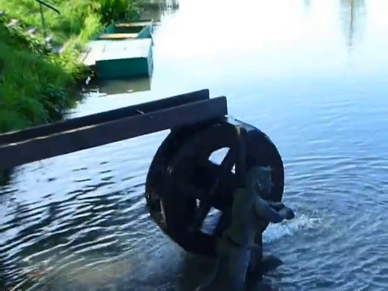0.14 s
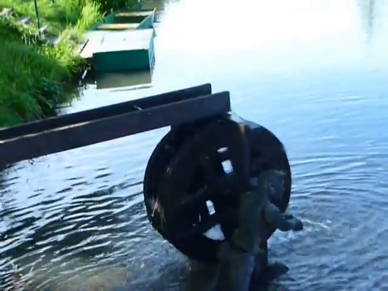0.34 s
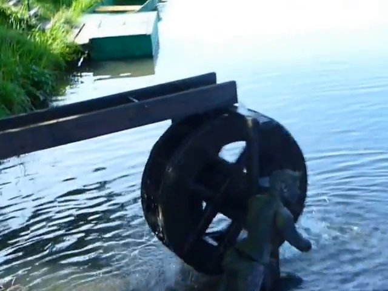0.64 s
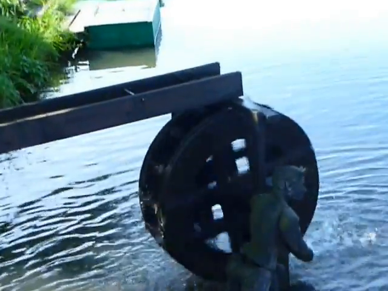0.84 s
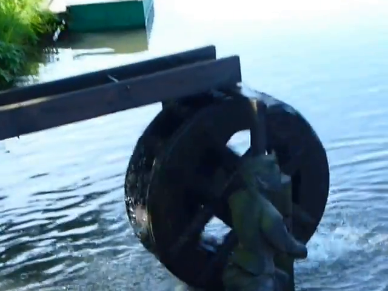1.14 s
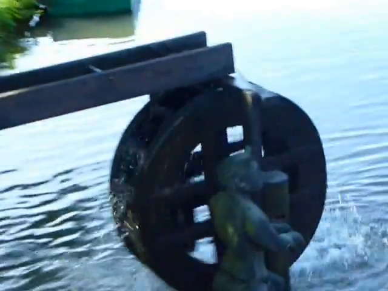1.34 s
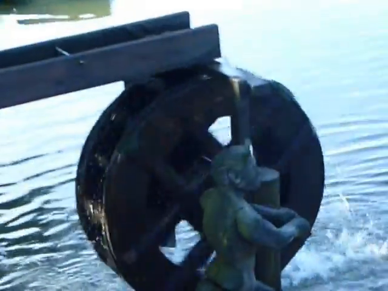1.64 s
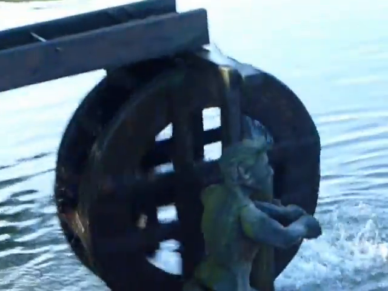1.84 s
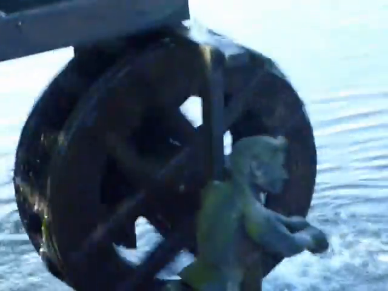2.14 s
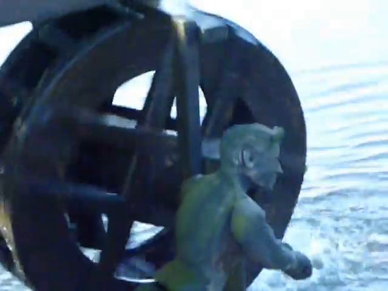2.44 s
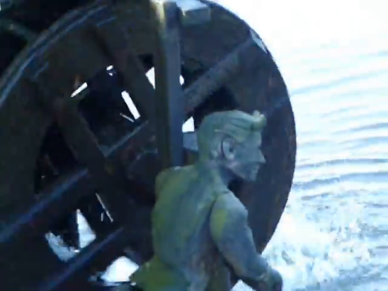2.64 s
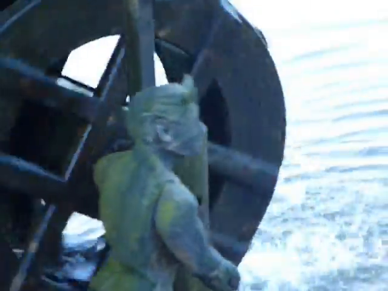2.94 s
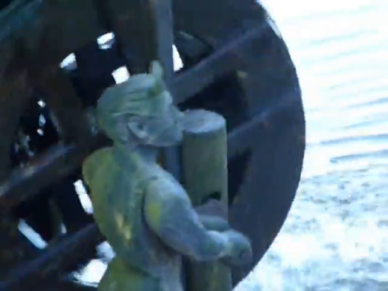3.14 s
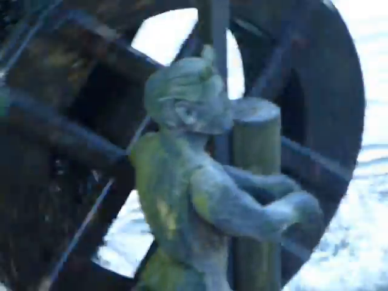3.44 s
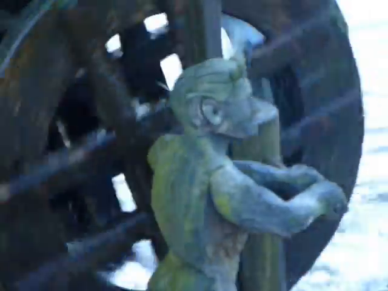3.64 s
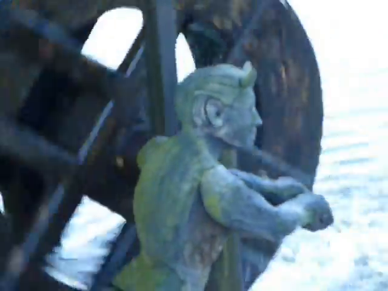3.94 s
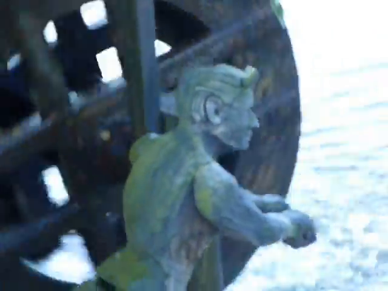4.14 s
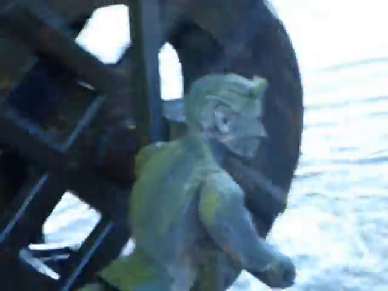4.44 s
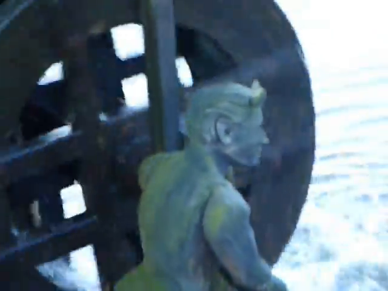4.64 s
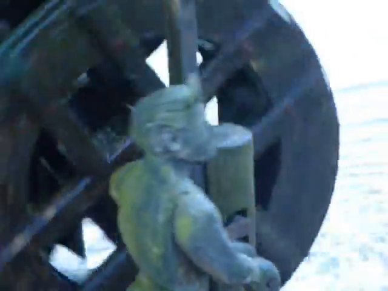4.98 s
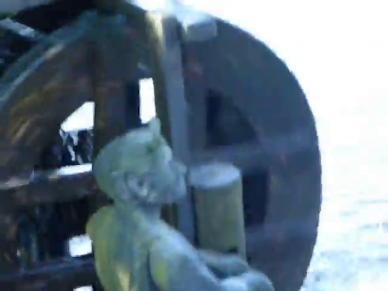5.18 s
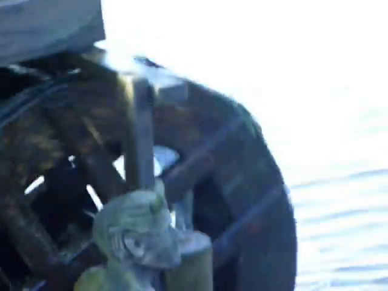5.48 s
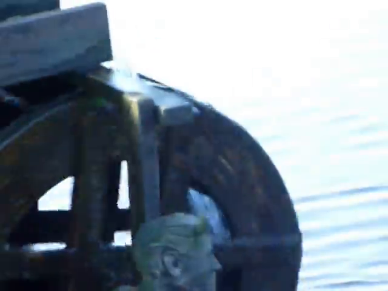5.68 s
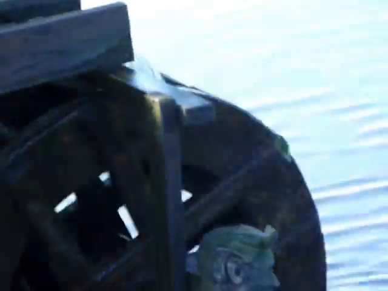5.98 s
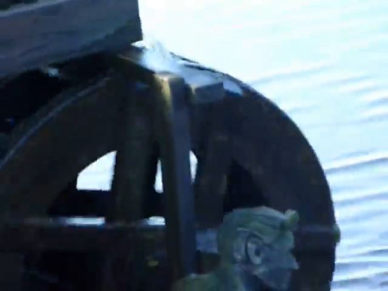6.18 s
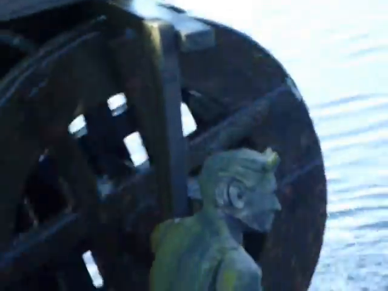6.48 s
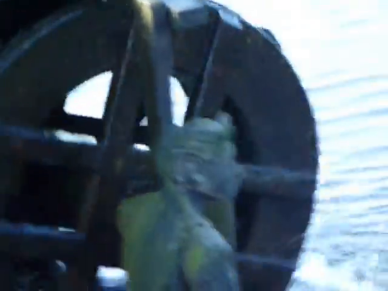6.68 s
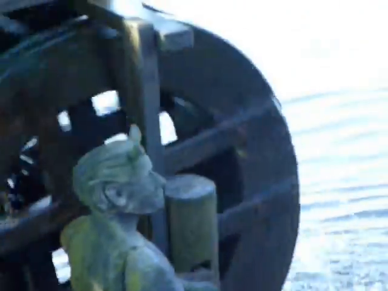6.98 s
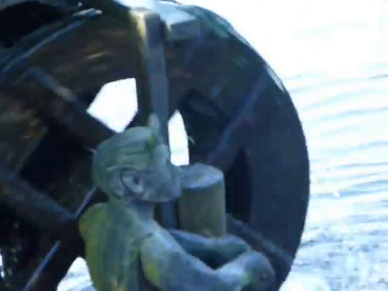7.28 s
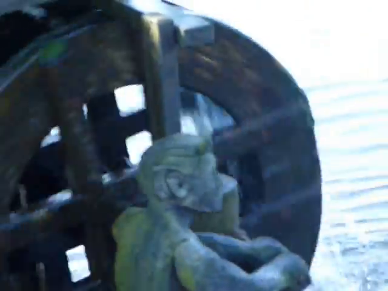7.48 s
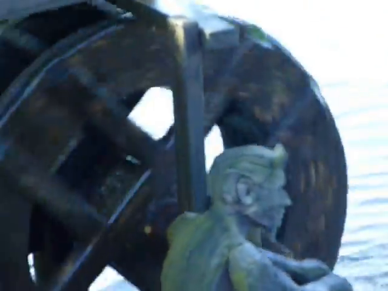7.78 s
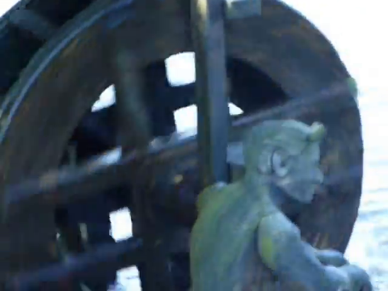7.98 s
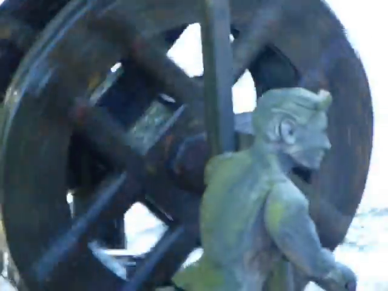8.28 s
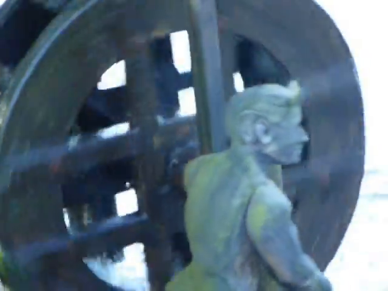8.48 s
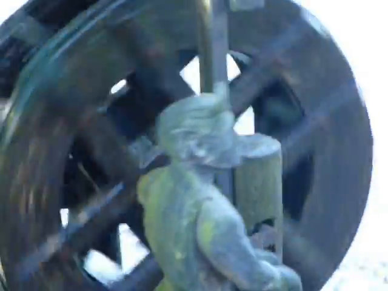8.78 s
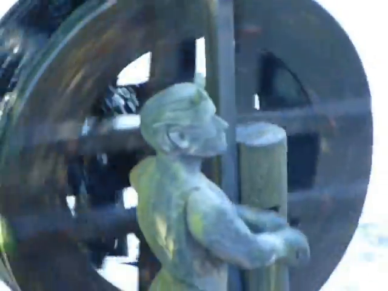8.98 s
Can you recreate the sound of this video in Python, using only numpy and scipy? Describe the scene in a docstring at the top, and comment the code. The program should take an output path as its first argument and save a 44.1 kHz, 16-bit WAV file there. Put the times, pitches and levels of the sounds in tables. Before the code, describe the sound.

Water rushes steadily over a small wooden water wheel, hollow paddle thumps rattling underneath, with splashes, gulps and light wind bumps on the microphone.

```python
"""Small wooden water wheel at a pond

Water rushes over the wheel and sprays into the pond: shaped noise with ringing bubbles and fine drops.
About eight times a second a paddle thumps the hollow wheel, and a crank knocks once a turn: struck modes.
Air pockets gulp below as rising tones, drops tick on wet wood, wind puffs on the microphone as low noise and eddies.
The mono recorder rounds peaks, limits the band, cuts three notches and adds an offset that steps once."""
import sys
import numpy as np
from scipy import signal
from scipy.fft import rfft, irfft, next_fast_len
from scipy.io import wavfile

SR = 44100
rng = np.random.default_rng(int(sys.argv[2]) if len(sys.argv) > 2 else 0)


def unload_wav(signal):
    """Save mono or channel-first audio to the path in sys.argv[1] as 16-bit WAV at rate SR, clipped to [-1, 1]."""
    wavfile.write(
        sys.argv[1],
        SR,
        np.round(np.clip(np.atleast_2d(signal).T, -1, 1) * 32767).astype(np.int16),
    )


N = 402191

TURN_S, FIRST_PADDLE_S, PADDLES = 1.8947, 0.0515, 16


def from_db(db):
    """dB to gain."""
    return 10 ** (np.asarray(db) / 20)


def rms_one(x):
    """Scale to rms 1."""
    return x / np.sqrt(np.mean(x ** 2) + 1e-20)


def in_time(rows):
    """Curve columns interpolated to every sample."""
    time_s, *columns = np.transpose(rows)
    return [np.interp(np.arange(N) / SR, time_s, column) for column in columns]


def drift(rate_per_s):
    """Slow random curve of spread 1: noise through two equal poles, made at SR / 40."""
    pole = np.exp(-80 * np.pi * rate_per_s / SR)
    noise = rng.standard_normal(N // 40 + 2002)
    slow = signal.lfilter([1], [1, -2 * pole, pole * pole], noise)[2000:]  # drop the start-up
    return np.interp(np.arange(N) / 40, np.arange(len(slow)), rms_one(slow))


def bell(time_s, half_width_s):
    """Smooth swell of height 1 around time_s."""
    return np.exp(-((np.arange(N) / SR - time_s) / half_width_s) ** 2)


def colour(x, points):
    """Filter x by a gain curve of (frequency [Hz], level [dB]) points, log in frequency; rms 1."""
    size = next_fast_len(N)
    hz = np.maximum(np.arange(size // 2 + 1) * SR / size, 1)
    points_hz, points_db = np.transpose(points)
    gain = from_db(np.interp(np.log(hz), np.log(points_hz), points_db))
    return rms_one(irfft(rfft(x, size) * gain, size)[:N])


def ring(clicks, hz, t60_s):
    """Two-pole resonator: a unit click starts a decaying sine of height 1."""
    decay = from_db(-60 / (t60_s * SR))
    w = 2 * np.pi * hz / SR
    # the tiny constant avoids denormals
    return signal.lfilter([0, np.sin(w)], [1, -2 * decay * np.cos(w), decay * decay], clicks + 1e-18)


def add(out, time_s, sound):
    """Mix a short sound into out at time_s."""
    at = max(round(time_s * SR), 0)
    out[at:at + len(sound)] += sound[:N - at]


def scattered(count, db, low_hz, high_hz):
    """Faint events at random times: rows of (time [s], level [dB], pitch [Hz])."""
    when, size, pitch = rng.random((count, 3)).T
    return list(zip(when * N / SR, db + 4 * (size - 0.5), low_hz * (high_hz / low_hz) ** pitch))


def water():
    """Noise sheet plus ringing bubbles (rush) and fine drops (spray), with the finest drops crackling on top."""
    # relative spectra: (frequency [Hz], level [dB])
    rush_spectrum = [(90, -41.5), (160, -4.5), (270, -4), (500, -7.5), (900, 0.5), (1200, -3.5), (1580, 2),
                     (2100, -11), (3000, -8.5), (5000, -28)]
    spray_spectrum = [(1200, -25.5), (2200, -5.5), (3000, -10.5), (3700, 0.5), (4000, -3.5), (4400, -5),
                      (5200, 3), (5900, 2), (6300, 4.5), (7500, -3.5), (8700, -14.5), (9600, -8.5),
                      (10400, -37)]
    crackle_spectrum = [(4000, -30), (6500, -14), (8000, 0), (9000, -5), (9700, -11), (10400, -26)]
    rush_db, spray_db = flow_db()
    rush_sheet, spray_sheet = rng.standard_normal((2, N))
    bubbles = droplets(2400, 248.5, 3030, cycles=19.7, spread_db=2.0, clump_db=1.34, count=40)
    fizz = droplets(9000, 1220, 12800, cycles=6.7, spread_db=3.0, clump_db=1.5, count=16)
    ticks = droplets(900, 6500, 11000, cycles=7.0, spread_db=3.0, clump_db=2.5, count=5)
    rush = colour(0.9 * rush_sheet + from_db(-9) * bubbles, rush_spectrum)
    crackle = from_db(-14.5) * colour(ticks, crackle_spectrum)
    spray = colour(0.85 * spray_sheet + fizz, spray_spectrum) + crackle
    return from_db(rush_db) * rush + from_db(spray_db) * spray


def flow_db():
    """Rush and spray levels: slow curve, random surges, splashes, and a spray swing at the paddle rate."""
    # falling water: (time [s], rush level [dB], spray level [dB])
    water_curve = [(0.0, -31, -32), (0.3, -31, -33), (0.45, -35, -36.5), (0.8, -32, -33.5),
                   (1.65, -30.5, -32), (2.3, -31.5, -32), (2.9, -31, -32.5), (3.4, -31.5, -31.5),
                   (3.75, -29.5, -30), (4.2, -30.5, -32), (4.55, -29.5, -29.5), (5.1, -29, -30.5),
                   (5.8, -28.5, -29), (6.13, -30, -33.5), (6.4, -29, -29.5), (7.0, -28.5, -30),
                   (7.75, -29.5, -30.5), (8.03, -31.5, -33.5), (8.5, -30, -31), (9.12, -29.5, -29.5)]
    # strong splashes: (time [s], rush swell [dB], spray swell [dB]); below 0 counts as none
    splashes = [(0.074, -3.5, 2.5), (0.138, 1, 2), (0.659, 2.5, 5), (1.088, 0, -4), (1.241, 4, 3),
                (1.665, 4, 0.5), (2.058, 2, 3), (3.106, 3.5, 2), (3.61, 3, -0.5), (3.747, 3, 0),
                (3.859, -2.5, 3.5), (4.44, 1.5, 0.5), (4.569, 0.6, 2.5), (4.67, 0.5, 4.5), (4.798, -5, 4),
                (4.917, 1, 2), (5.028, 0, 6.5), (5.145, 3.5, 5.5), (6.24, -1.5, 4), (6.511, 3, 0.5),
                (6.82, 1, 0), (6.88, 0.5, 1), (7.816, 4, 1.5), (8.139, 1.5, 4), (8.36, 0.5, 2),
                (8.466, 2.5, 5.5), (8.939, -1, 3)]
    splash_half_width_s = 0.016
    surge_db, surges_per_s, shared_weight = 0.63, 18, 0.98
    swing_db, spray_lag_s = 0.38, 0.033

    rush_db, spray_db = in_time(water_curve)
    shared = shared_weight * drift(surges_per_s)
    rush_db = rush_db + surge_db * rms_one(shared + drift(surges_per_s))
    spray_db = spray_db + surge_db * rms_one(shared + drift(surges_per_s))
    for time_s, rush_up_db, spray_up_db in splashes:
        swell = bell(time_s, splash_half_width_s)
        rush_db = rush_db + max(rush_up_db, 0) * swell
        spray_db = spray_db + max(spray_up_db, 0) * swell
    paddles_passed = (np.arange(N) / SR - FIRST_PADDLE_S - spray_lag_s) * PADDLES / TURN_S
    return rush_db, spray_db + swing_db * np.cos(2 * np.pi * paddles_passed)


def droplets(per_s, low_hz, high_hz, cycles, spread_db, clump_db, count):
    """Random clumped drops of uneven size, each ringing at one of count pitches (t60 in cycles); rms 1."""
    sizes = from_db(spread_db * np.minimum(rng.exponential(1, N), 5)) * rng.choice([-1, 1], N)
    born = rng.random(N) < per_s / SR
    sizes = sizes * born * from_db(clump_db * drift(31))
    dealt = rng.integers(0, count, N)
    out = np.zeros(N)
    for k, hz in enumerate(np.geomspace(low_hz, high_hz, count)):
        out += ring(sizes * (dealt == k), hz, cycles / hz) * np.sqrt(hz)  # evens out the level per octave
    return rms_one(out)


def paddles():
    """Each thump strikes the hollow wheel's modes; hard blows wake the four upper ones."""
    # wheel modes: (frequency [Hz], level [dB], t60 [s])
    wheel_modes = [(227, 0, 0.097), (271.5, 2, 0.12), (336, 4.5, 0.039), (464, -1.5, 0.084),
                   (573, 4, 0.012), (730, -1, 0.017)]
    signs = [-1, 1, 1, -1, 1, -1]
    contact_s = 0.0035  # water cushions the blow on the two low modes
    low_cut_hz = 151  # the small wheel gives off no deep bass

    time_s, upper_db, lower_db, hard_db = all_thumps().T
    at = np.round(time_s * SR).astype(int)
    pole = np.exp(-1 / (contact_s * SR))
    out = np.zeros(N)
    for k, (hz, level_db, t60_s) in enumerate(wheel_modes):
        blow_db = [lower_db, 0, hard_db][min(k, 2)]
        clicks = np.zeros(N)
        clicks[at] = from_db(upper_db + level_db + blow_db) * signs[k]
        struck = ring(clicks, hz, t60_s)
        if k < 2:
            lift = np.hypot(1, 2 * np.pi * hz * contact_s)  # makes up the cushion's loss at hz
            struck = signal.lfilter([1 - pole], [1, -pole], struck) * lift
        out += struck
    return signal.sosfilt(signal.butter(2, low_cut_hz, "high", fs=SR, output="sos"), out)


def all_thumps():
    """Loud thumps, plus a soft one for each passing paddle with no loud thump near."""
    # loud thumps: (time [s], second mode level [dB], lowest mode re second [dB], four upper modes re second [dB])
    loud = [(0.0479, -25, -1, -21), (0.28, -31, 1, -19), (0.4097, -12, 1, -11.5), (0.759, -30, -6, -13),
            (0.8879, -29, 1, -11), (1.2303, -28.5, 7, -13), (1.3463, -30, 4.5, -23), (1.4604, -23, -9, -25),
            (1.9494, -28, 9, -16), (2.0683, -33, 7, 0), (2.187, -25, 0.5, -21), (2.2987, -21, -2, -17),
            (2.4232, -21.5, -4, -18), (2.768, -26, 2, -16), (3.1225, -17, 3, -26),
            (3.2372, -19.5, 0.5, -10), (3.362, -23, 3, -20), (3.6008, -26, 5, -7),
            (4.0745, -25.5, -12, -20), (4.1935, -16, 0.5, -4), (4.317, -38, 11, -12),
            (4.5441, -27.5, -11, -14), (4.784, -22.5, 2.5, -11.0), (4.8963, -30, 7, -14.5),
            (5.1332, -29, -19, -23), (5.2556, -14, 2, -7), (5.6073, -32, -16, -12), (5.7258, -25.5, 3, -19),
            (5.975, -21, -17, -15), (6.0899, -19.5, -12, -9), (6.333, -20, -21, -20),
            (6.568, -22.5, -2.5, -18), (6.7991, -23.5, -3, -13), (6.9129, -19, -1, -18),
            (7.0295, -18.5, 0, -12), (7.156, -18.5, 8, -9), (7.2756, -31, 3, 4.5), (7.6266, -18.5, 8.5, -4),
            (7.8656, -25.5, -3, -16), (7.9934, -12, 2.5, -18), (8.3425, -31, -3, -7), (8.463, -27, 4, -18),
            (8.703, -23.5, -4, -22), (8.9325, -25.5, 6, -6.0), (9.047, -22.5, -2, -4)]
    # soft thumps, a row per column above, time as lateness: (mean, spread) [s, then dB]
    soft_spread = [(0, 0.00376), (-34.5, 3.7), (-7.5, 8.3), (-14.5, 7.1)]
    step_s = TURN_S / PADDLES
    due_s = np.arange(FIRST_PADDLE_S, N / SR - step_s / 2, step_s)
    mean, spread = np.transpose(soft_spread)
    soft = mean + spread * rng.standard_normal((len(due_s), 4))
    soft[:, 0] += due_s
    gap_s = np.abs(due_s[:, None] - np.array(loud)[:, 0]).min(axis=1)
    return np.vstack([loud, soft[gap_s > step_s / 2]])


def crank():
    """The wooden arm takes up its play with a dry knock once a turn: three decaying modes."""
    # knocks: (time [s], level [dB])
    knocks = [(1.079, -30), (2.97, -28.5), (4.855, -25), (6.749, -24.5), (8.657, -25.5)]
    # arm modes: (frequency [Hz], level [dB], t60 [s])
    arm_modes = [(363, 4, 0.045), (630, 2.5, 0.073), (820, -4, 0.15)]
    clicks = np.zeros(N)
    for time_s, level_db in knocks:
        clicks[round(time_s * SR)] = from_db(level_db)
    return sum(from_db(level_db) * ring(clicks, hz, t60_s) for hz, level_db, t60_s in arm_modes)


def gulps():
    """Large air pockets close under the wheel, small ones behind single drops in the pond."""
    # pockets under the wheel: (time [s], level [dB], pitch [Hz])
    wheel_pockets = [(0.23, -27, 293), (1.115, -30, 332), (1.318, -34, 280), (1.55, -28, 331),
                     (2.12, -28, 307), (2.389, -33, 332), (3.417, -26, 294), (3.561, -27, 306),
                     (3.789, -22, 247), (5.44, -22.5, 286), (5.5, -23.5, 323), (6.989, -28, 222),
                     (7.21, -25, 290), (7.35, -26, 291), (7.46, -29, 290), (7.806, -29, 296)]
    # single drops in the pond: (time [s], level [dB], pitch [Hz])
    pond_drops = [(0.136, -22, 970), (2.058, -18, 1660), (2.348, -20, 1480), (2.996, -22, 804),
                  (3.031, -30, 1590), (3.105, -24, 1600), (3.742, -23, 1530), (4.273, -19.5, 1330),
                  (4.913, -18, 1000), (5.133, -21, 1590), (6.682, -21, 650), (6.731, -23, 1600),
                  (6.877, -18, 796), (7.808, -29, 950), (8.719, -25, 1560)]
    large = wheel_pockets + scattered(count=6, db=-29, low_hz=225, high_hz=335)
    small = pond_drops + scattered(count=20, db=-23.5, low_hz=670, high_hz=1670)
    return (air_pockets(large, rise_cycles=1.2, ring_cycles=4.6, glide=0.0043)
            + air_pockets(small, rise_cycles=0.51, ring_cycles=3.1, glide=0.0031))


def air_pockets(events, rise_cycles, ring_cycles, glide):
    """A closing air pocket rings a few cycles and rises in pitch."""
    out = np.zeros(N)
    for time_s, level_db, hz in events:
        cycles = np.arange(SR // 8) / SR * hz
        shape = (1 - np.exp(-cycles / rise_cycles)) * np.exp(-cycles / ring_cycles)
        tone = np.sin(2 * np.pi * (cycles + glide * cycles ** 2))
        add(out, time_s - rise_cycles / hz, from_db(level_db) * shape / shape.max() * tone)
    return out


def spatters():
    """A drop bursting on wet wood: a bright tick of two damped resonances."""
    # sharp spatters: (time [s], level [dB])
    sharp = [(1.477, -23), (1.642, -23), (4.441, -19), (5.599, -19), (6.3854, -19), (6.5161, -22),
             (6.8099, -19), (6.99, -21)]
    soft = zip(rng.random(18) * (N - 1) / SR, -25 + rng.normal(0, 1.5, 18))
    clicks = np.zeros(N)
    for time_s, level_db in sharp + list(soft):
        clicks[round(time_s * SR)] = from_db(level_db)
    return ring(clicks, hz=8080, t60_s=0.0011) - 1.1 * ring(clicks, hz=6830, t60_s=0.01)


def wind():
    """Wind on the microphone: lumpy low noise, short eddies rising in pitch, and gliding low tones."""
    # noise between puffs: (time [s], level [dB])
    wind_curve = [(0.0, -52), (0.45, -57), (0.7, -57), (1.1, -49.5), (1.6, -45), (1.75, -52), (2.6, -62),
                  (3.1, -44), (3.4, -47), (3.8, -35), (4.0, -45), (4.55, -54.5), (5.3, -46), (5.95, -41),
                  (6.4, -51), (7.3, -46.5), (7.95, -57), (8.65, -50.5), (9.12, -50)]
    # strong puffs: (time [s], level [dB], centre frequency [Hz])
    puffs = [(1.165, -34, 80), (1.244, -38, 100), (1.397, -30, 75), (1.529, -22, 170), (3.06, -39, 166),
             (3.165, -35, 86), (3.198, -30, 104), (3.31, -31, 95), (3.341, -30, 95), (3.422, -18.5, 125),
             (3.447, -17, 180), (3.636, -14.5, 152), (3.65, -13, 150), (3.74, -20, 138), (3.783, -9.5, 168),
             (3.81, -23, 166), (3.853, -20, 87), (3.887, -14.5, 181), (3.902, -17, 146), (4.024, -32, 113),
             (4.277, -21.5, 120), (4.289, -24, 121), (4.412, -30, 90), (4.43, -19.5, 134),
             (4.896, -29, 110), (5.306, -30, 110), (5.429, -28, 140), (5.575, -31, 151), (5.641, -23, 138),
             (5.806, -37, 103), (5.891, -26, 111), (5.904, -18, 172), (5.923, -20, 138), (5.981, -32, 110),
             (6.03, -26, 95), (6.055, -25, 166), (6.201, -28, 151), (6.294, -30, 124), (7.203, -35, 110),
             (7.548, -24, 125), (7.667, -29, 115), (8.31, -34, 110), (8.657, -34, 110), (8.831, -31, 166)]
    # upward glides: (start [s], end [s], start frequency [Hz], end frequency [Hz], level [dB])
    glides = [(1.465, 1.546, 105, 193, -35), (1.57, 1.671, 95, 180, -30.5), (3.475, 3.585, 106, 201, -30)]
    # relative noise spectrum: (frequency [Hz], level [dB])
    gust_spectrum = [(25, -17), (50, -1), (80, 2), (120, 5.5), (180, 2), (400, -32)]
    lumps_db, lumps_per_s = 4.5, 13.0
    burst_db, burst_half_width_s = -17.5, 0.021  # noise burst with each puff, re the puff
    puff_rise = 0.074  # pitch climbs by twice this share of hz each cycle

    level = from_db(in_time(wind_curve)[0] + lumps_db * drift(lumps_per_s))
    for time_s, puff_db, _ in puffs:
        level = level + from_db(puff_db + burst_db) * bell(time_s, burst_half_width_s)
    out = level * colour(rng.standard_normal(N), gust_spectrum)

    t = np.arange(-SR // 16, SR // 16) / SR
    for time_s, puff_db, hz in puffs:
        cycles = hz * t
        shape = np.exp(-(cycles / 0.61) ** 2)
        eddy = np.cos(2 * np.pi * (cycles + puff_rise * cycles ** 2))
        add(out, time_s - 1 / 16, from_db(puff_db) * shape * eddy)

    for start_s, end_s, start_hz, end_hz, glide_db in glides:
        size = round((end_s - start_s) * SR)
        cycles = np.cumsum(np.linspace(start_hz, end_hz, size)) / SR
        add(out, start_s, from_db(glide_db) * np.sqrt(np.hanning(size)) * np.sin(2 * np.pi * cycles))
    return out


def scene():
    """Open air over the pond: all sources summed, no room."""
    return (water() + spatters() + paddles() + crank() + gulps() + wind())[None]


def record(dry):
    """Recorder: rounded peaks, band limits, three notches, steep top cut, offset that steps once."""
    notch_hz = [3001, 4398, 5409]  # centre frequencies [Hz]
    notch_width_hz = [680, 410, 200]  # widths [Hz]
    ceiling = 0.6
    low_hz, high_hz, cutoff_hz = 43.7, 8610, 10330
    step_s, offsets = 3.59, (-0.0418, -0.0526)  # before and after the step

    x = ceiling * np.tanh(dry / ceiling)
    x = signal.sosfilt(signal.butter(1, low_hz, "high", fs=SR, output="sos"), x)
    x = signal.sosfilt(signal.butter(10, high_hz, fs=SR, output="sos"), x)
    for hz, width_hz in zip(notch_hz, notch_width_hz):
        x = signal.lfilter(*signal.iirnotch(hz, hz / width_hz, fs=SR), x)
    x = signal.sosfilt(signal.ellip(12, 0.5, 60, cutoff_hz, fs=SR, output="sos"), x)
    return x + np.interp(np.arange(N) / SR, [step_s, step_s + 0.01], offsets)


dry = scene()
out = record(dry)
unload_wav(out)
```